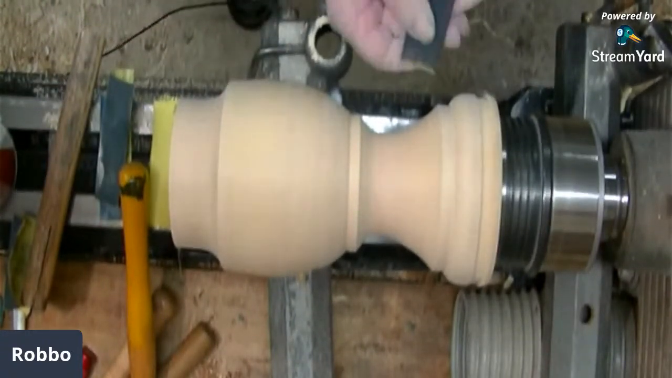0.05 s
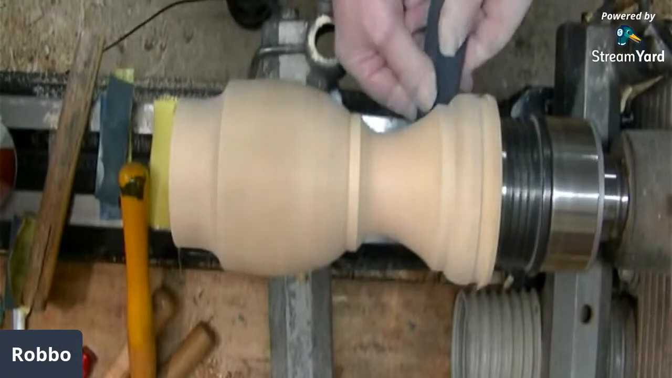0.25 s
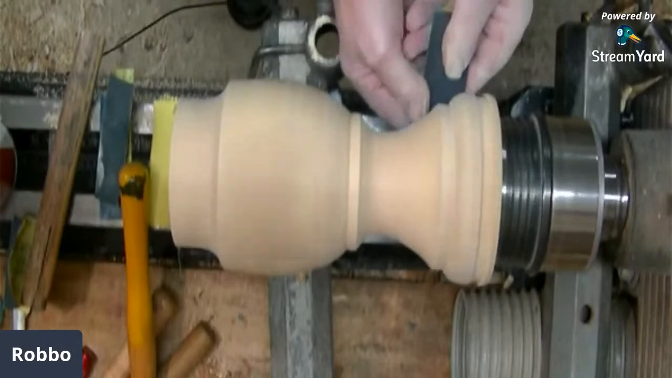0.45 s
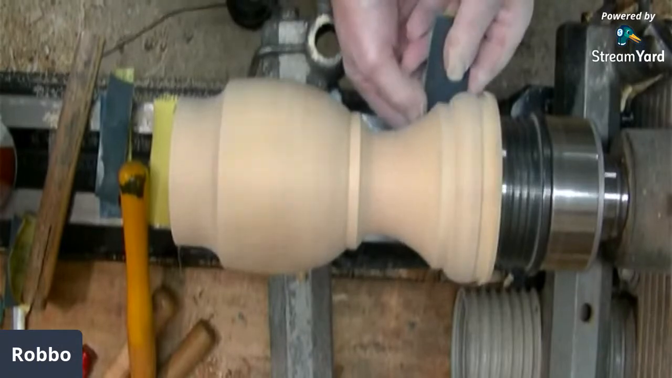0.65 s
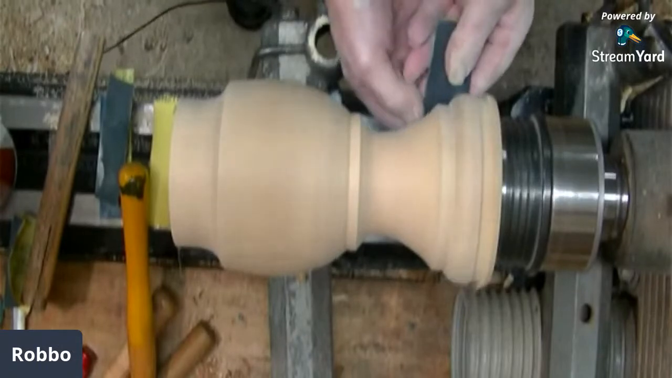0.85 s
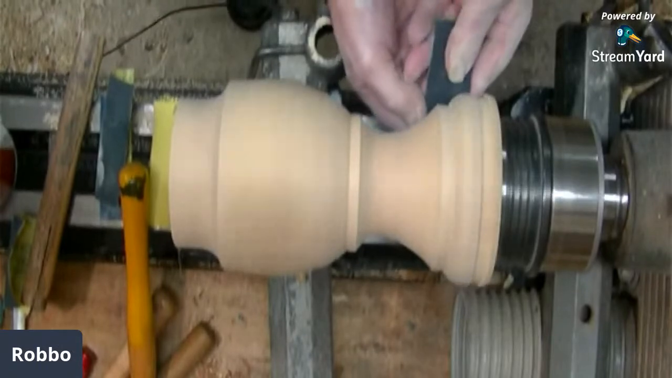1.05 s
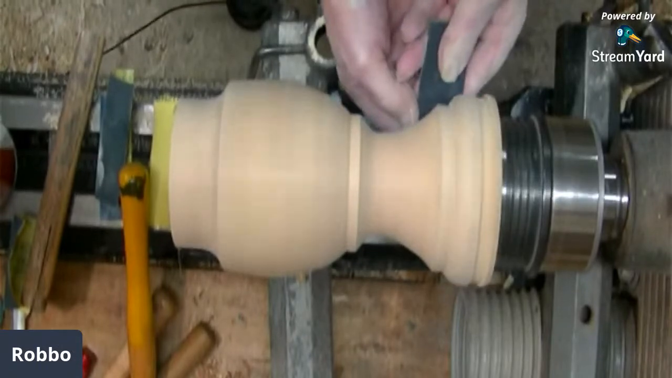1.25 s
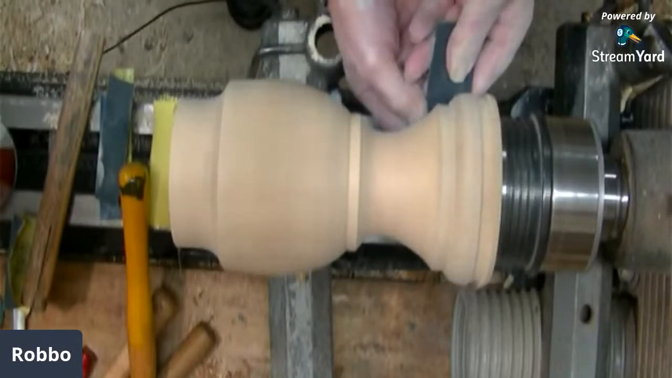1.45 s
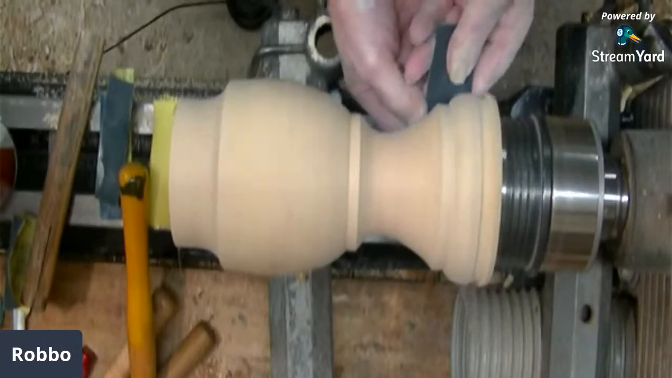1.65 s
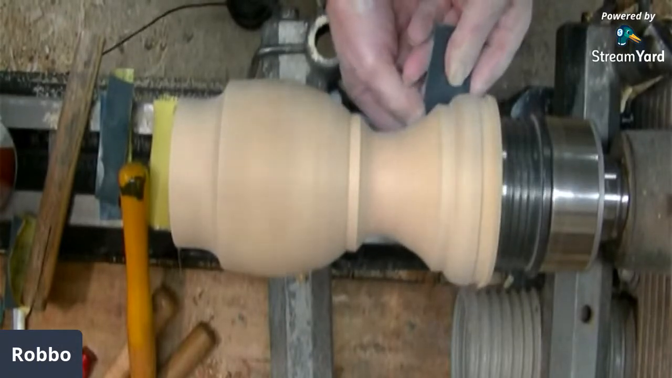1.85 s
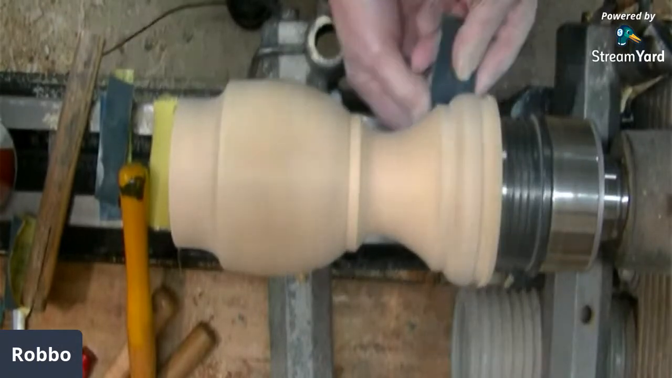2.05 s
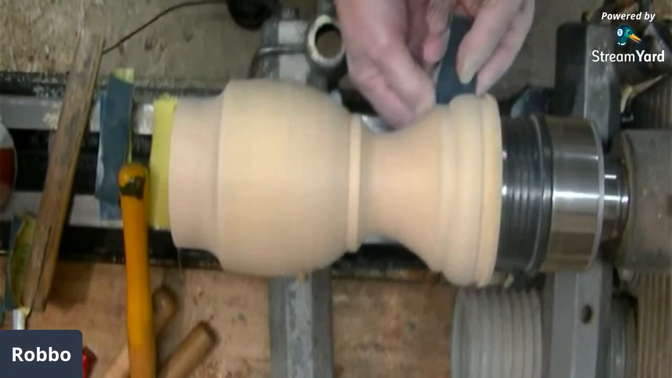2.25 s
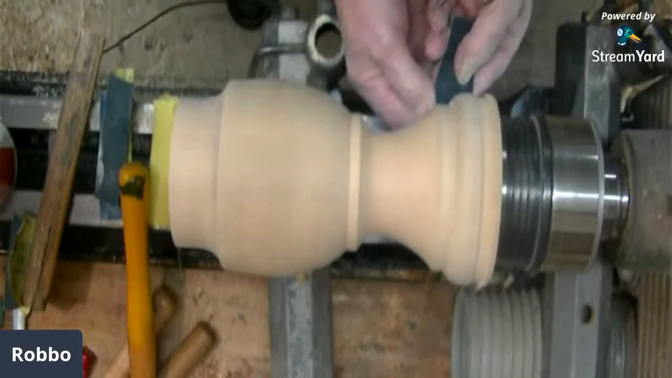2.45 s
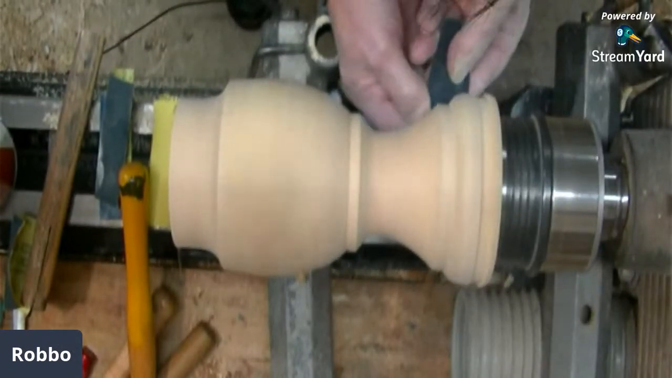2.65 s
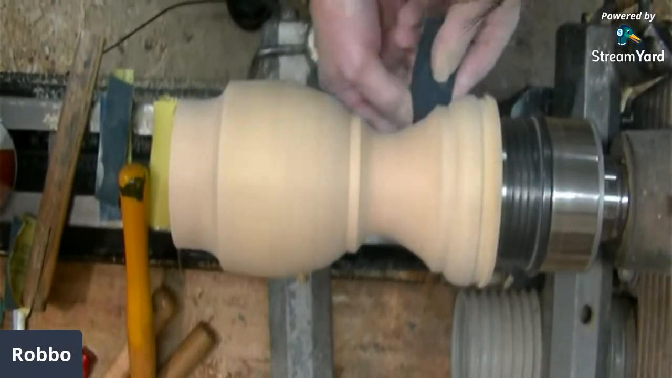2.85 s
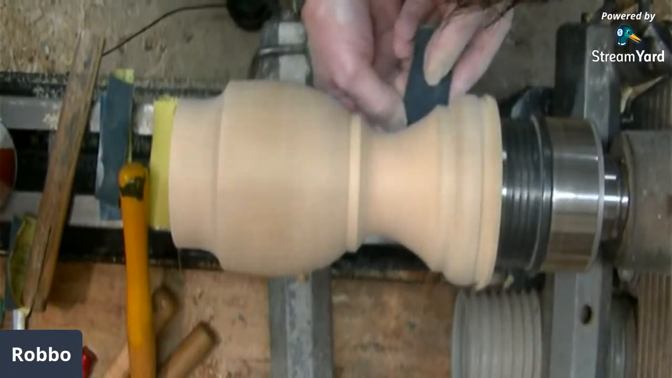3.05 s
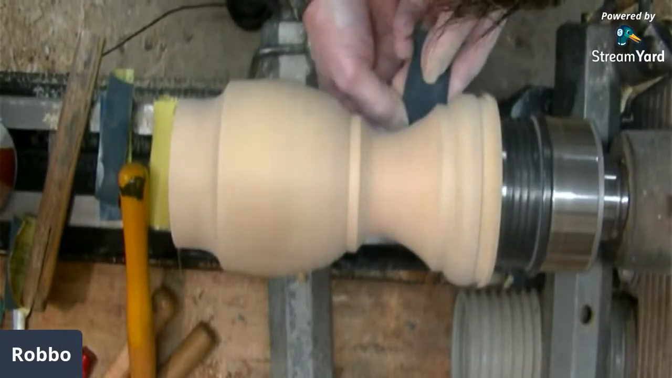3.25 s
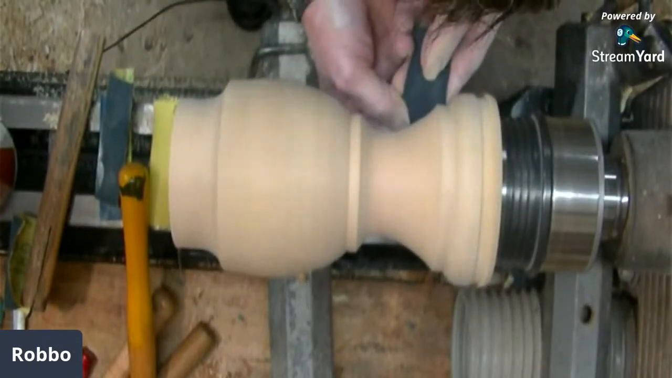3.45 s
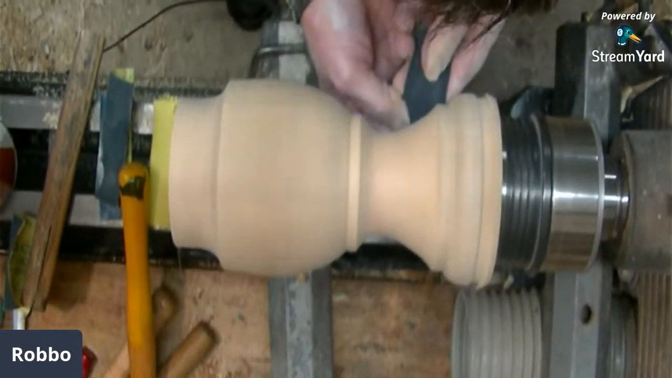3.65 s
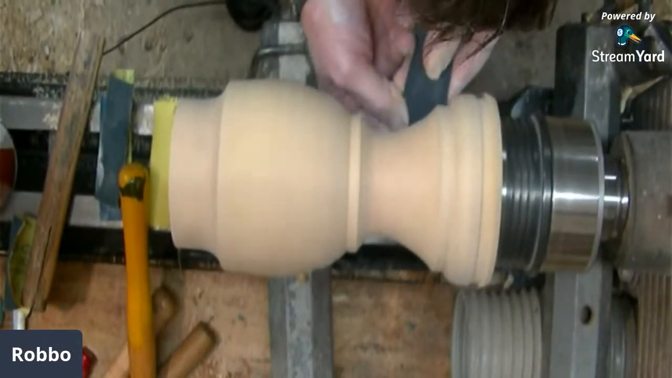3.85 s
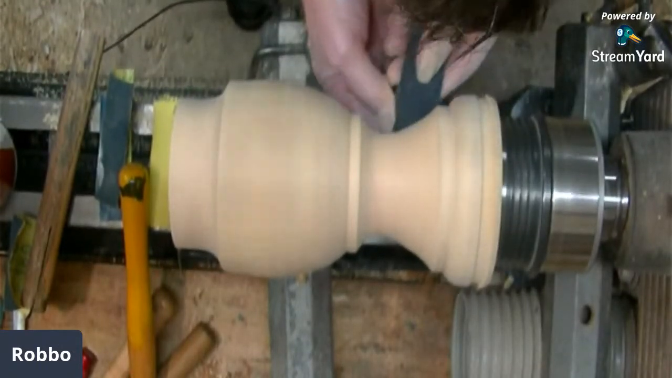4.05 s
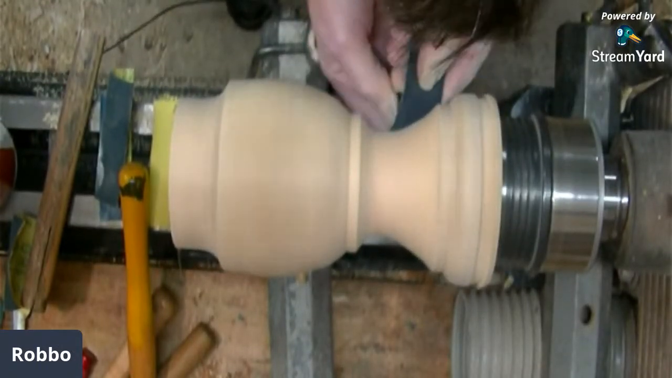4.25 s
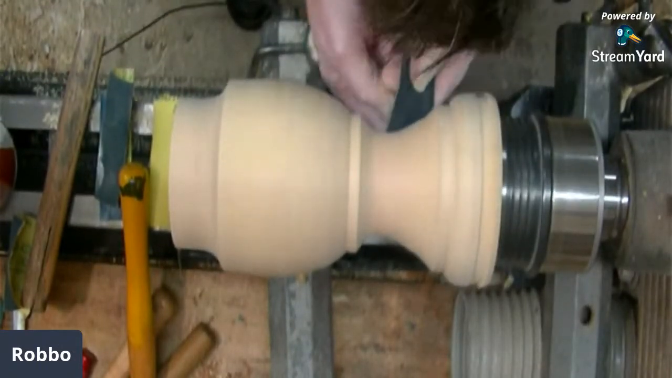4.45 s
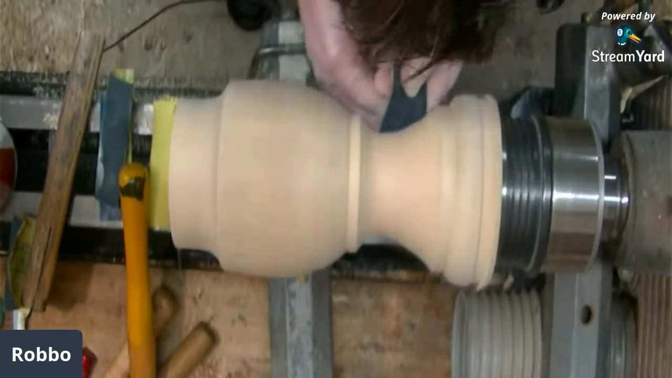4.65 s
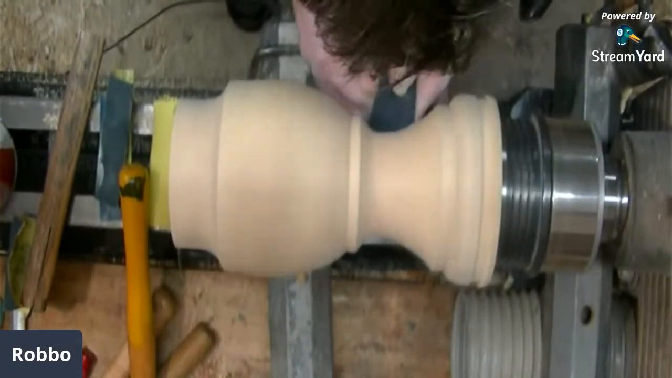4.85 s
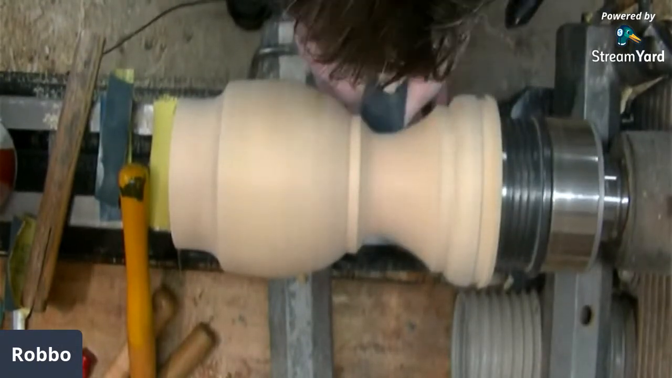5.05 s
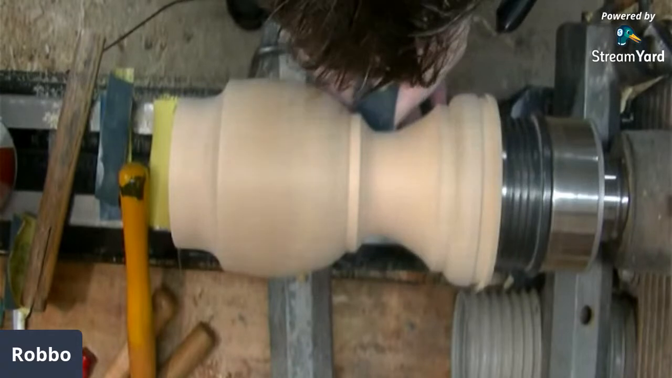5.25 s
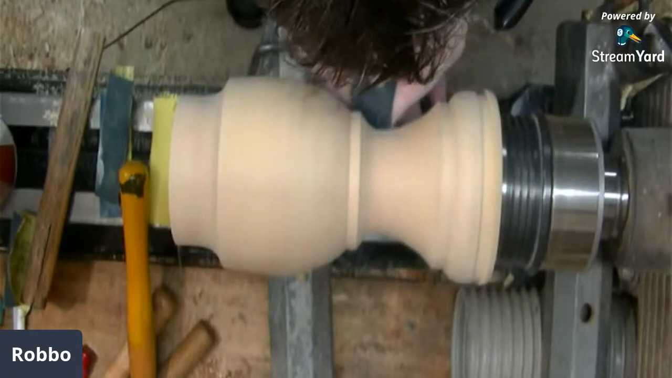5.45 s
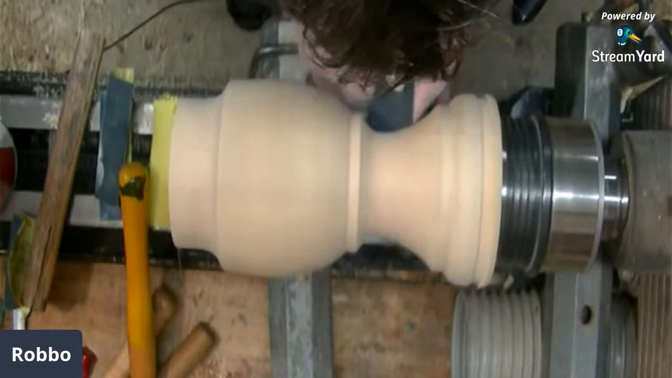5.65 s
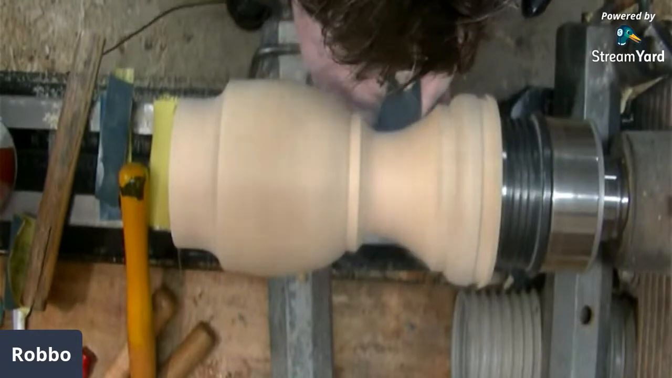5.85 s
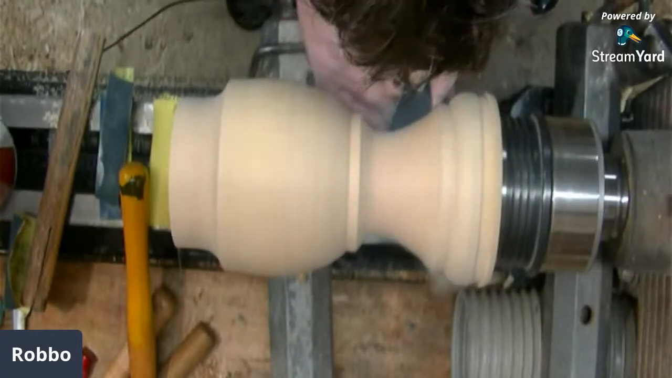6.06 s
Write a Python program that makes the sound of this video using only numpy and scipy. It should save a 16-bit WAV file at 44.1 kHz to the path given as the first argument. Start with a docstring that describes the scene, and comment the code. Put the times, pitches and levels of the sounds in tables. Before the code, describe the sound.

Close in a workshop, a lathe motor blows steady air with a faint hum and thin high whine. After about half a second, sandpaper meets the spinning wood with a bright, gritty rasp, fluttering quickly with each turn. It eases near two seconds, returns near three, breaks briefly around four, then continues strongly to the end. Occasional low thuds.

```python
"""Sanding a turning vase

Abrasive paper rasps against a wooden vase spinning on a lathe, close to one microphone.
Noise for the grit is coloured by paper, wood and fingers; rings shift with the grip, and each turn throbs.
Behind it the motor blows (shaped noise) and hums, its drive whines (narrowband noise tones),
and now and then a low thud, a few enveloped cycles with a dull knock, reaches the microphone."""
import sys
import numpy as np
from scipy import signal
from scipy.io import wavfile
from scipy.ndimage import uniform_filter1d

SR = 44100
rng = np.random.default_rng(int(sys.argv[2]) if len(sys.argv) > 2 else 0)


def generate_wav(sig):
    """Save sig (samples, or channels by samples) to the path in sys.argv[1] as 16-bit PCM at SR."""
    pcm = np.round(np.clip(np.atleast_2d(sig).T, -1, 1) * 32767).astype(np.int16)
    wavfile.write(sys.argv[1], SR, pcm)


N = 269451  # samples

# How the grip loads paper and wood: (time [s], paper fold ring [dB], grit hiss over fold [dB],
# wood scrape over fold [dB], wooden body ring [dB])
GRIP = [(0, -48.5, -6, 5.5, -37.5), (0.36, -48.5, 1, 5, -37), (0.47, -31, -2, -3, -38),
        (0.56, -32, -3, -2, -36.5), (0.63, -24.5, 5, -6, -32.5), (0.8, -21.5, -2.5, -7, -33.5),
        (0.95, -24.5, 2, -7, -33), (2.08, -28.5, 4, -2.5, -35), (2.18, -33, -2, -2, -36),
        (2.68, -33.5, -4, -2, -36.5), (2.78, -38, 1, -1, -34.5), (2.86, -38, 7, -9, -37),
        (2.89, -26.5, -4, -3, -34.5), (2.94, -31, -1, -5, -34.5), (2.98, -41.5, 2, 6, -41),
        (3.03, -24.5, 1, -8, -34.5), (3.33, -22, -5.5, -8.5, -33), (3.56, -25.5, 3, -5.5, -33.5),
        (4.02, -30.5, -3, -6, -37.5), (4.1, -48.5, -4, 5, -38), (4.21, -23.5, 1, -3, -35.5),
        (4.45, -26, 3, -2, -35), (4.62, -22.5, -2, -6.5, -34), (4.8, -23, 2.5, -3.5, -35.5),
        (5.15, -23, 2.5, -2, -31.5), (5.58, -24.5, 3.5, -2, -31), (5.72, -23.5, 1.5, -7, -36.5),
        (6.11, -25, 0.5, -7, -34.5)]
# Spectrum of the grit hiss: (frequency [Hz], relative density [dB per Hz])
GRIT_SPECTRUM = [(6000, -40), (9000, -22), (11500, -6), (12200, 5), (14500, 3.5), (15500, 3.5),
                 (17000, -12)]
# Spectrum of the ringing paper fold: (frequency [Hz], relative density [dB per Hz])
FOLD_SPECTRUM = [(6500, -44), (7800, -15.5), (8200, -0.5), (10000, 1.5), (11600, 2.5), (12200, -8),
                 (14000, -14.5)]
# Spectrum of the wood scrape: (frequency [Hz], relative density [dB per Hz])
SCRAPE_SPECTRUM = [(1800, -24), (3000, -24), (3800, -1.5), (4600, 1), (5600, -1), (7000, 3.5), (7600, 1),
                   (7900, 1.5), (10000, -32)]
# The paper bites harder, or slips, for a moment: (middle [s], half length to 1/e [s], change [dB])
BITES = [(0.65, .03, -2), (0.862, .03, 6.5), (0.91, .02, -2), (1.07, 0.032, 1.5), (1.21, 0.023, 2),
         (1.37, 0.028, 1), (1.58, .03, 0), (1.785, 0.036, 1), (2.73, 0.024, 9), (2.805, .015, -11),
         (3.157, 0.033, 2), (3.495, .04, 1), (3.827, 0.026, 3), (3.89, .015, -2), (3.94, .03, 2),
         (4.22, 0.031, 2), (4.303, 0.02, 6), (4.51, 0.027, 3), (4.817, .04, 1.5), (4.92, .025, 2),
         (5.0, .03, 3), (5.3, .02, 1), (5.33, .015, -4), (5.4, 0.045, 1.5), (6.036, .03, 5)]
# A hollow between fingers and paper rings while the grip holds its shape:
# (middle [s], half length to 1/e [s], frequency [Hz], boost [dB])
HOLLOWS = [(0.49, .05, 9550, 7), (0.75, 0.12, 5030, 10), (0.86, 0.055, 10900, 4.5), (1.09, 0.2, 4800, 3.5),
           (1.21, 0.037, 10600, 4.5), (1.65, .1, 4670, 2.5), (2.05, 0.074, 6800, 4), (2.9, .05, 11100, -1),
           (2.903, 0.027, 3520, 4), (3.25, 0.14, 3500, 2.5), (3.107, 0.066, 6670, 10),
           (3.21, .05, 6100, 6.5), (3.36, .14, 11200, 2), (3.56, 0.15, 8840, 5), (4.6, .12, 6300, 12),
           (4.86, 0.19, 5700, 6.5), (5.02, .08, 6040, 3), (5.13, 0.063, 4700, 6), (5.48, 0.1, 10300, 7.5),
           (5.5, .15, 4200, 3), (6.004, 0.12, 6840, 6)]
# Spectrum of the cooling air: (frequency [Hz], relative density [dB per Hz])
BLOWER_SPECTRUM = [(20, -24), (60, -26), (240, -17.5), (420, -11.5), (700, -8), (1300, -4.5), (2200, -4.5),
                   (3000, -7.5), (4500, -11), (7600, -22.5), (7900, -25), (8200, -7.5), (9600, -14),
                   (10500, -32), (15600, -15.5)]
# Strength of the cooling air: (time [s], level [dB])
BLOWER_LEVEL = [(0, -35.5), (1.3, -36), (2.5, -35), (4, -34.5), (5, -34.5), (6.11, -33)]
# Motor and frame tones: (frequency [Hz], nominal width [Hz], level [dB])
HUM_TONES = [(98, 39, -71.5), (50, 4, -77), (200, 30, -58), (288.7, 7.8, -63.5), (365.5, 23, -65),
             (503.5, 11.6, -60.5), (593, 30, -56.5), (751, 6.8, -60.5), (900, 11, -58), (1212, 53, -56.5),
             (1385, 19, -76), (1419, 24, -54)]
# Swells of the whirr: (time [s], level [dB])
WHIRR_LEVEL = [(0, -48), (1.3, -51), (1.7, -44.5), (2.2, -42.5), (2.5, -52), (3.4, -54), (4.2, -40),
               (4.6, -47), (5.2, -42), (6.11, -44.5)]
# The drive's pair of switching tones: (frequency [Hz])
WHINE_HZ = [8962, 9022]
# Low thuds: (start [s], nominal peak [dB], frequency [Hz], time scale [s], knock [dB])
THUDS = [(0.259, -40, 127, 0.032, -49), (0.384, -45, 166, 0.038, -48), (0.635, -46, 155, 0.039, -43),
         (1.831, -32, 154, 0.027, -48), (1.844, -40, 143, 0.028, -45), (3.549, -39, 145, 0.029, -47),
         (4.611, -40, 113, 0.044, -47), (4.652, -31, 126, 0.035, -53), (5.836, -41, 199, 0.049, -48),
         (5.914, -39, 113, 0.034, -35.5), (5.96, -40.5, 146, 0.063, -42.5)]

FRAME, HOP = 512, 128  # samples, for the rasp's moving spectrum
TURNS_HZ = 13.15
FOLD_SHARE, SCRAPE_SHARE = 0.28, 0.067  # of each bite's dB
HOLLOW_HALF_WIDTH_HZ = 860  # to 1/e of the boost in dB
FOLD_HZ, PALM_HZ, PALM_DB = 10450, 4660, 1.5
BODY_HZ, BODY_FROM_DB, BODY_HZ_PER_DB = 2870, -36, 49  # the body's ring rises as it swells
BODY_FLICKER_DB = 1  # rms
WHIRR_HZ, WHINE_DB = 1770, -54.5  # whine level of each tone
EDGE_HZ = 15720  # upper band limit


def gain_of(db):
    """Logarithmic level: decibels become an amplitude ratio."""
    return 10 ** (np.asarray(db) / 20)


def evened(x):
    """Power normalisation: scales a signal to rms 1."""
    return x / np.sqrt(np.mean(x ** 2) + 1e-20)


def unit(gain):
    """Power normalisation of a spectrum: the squares in each column sum to one."""
    return gain / np.linalg.norm(gain, axis=0)


def read(points, hz):
    """Spectral density on a log frequency axis, as a column of gains with unit total power."""
    f, db = np.transpose(points)
    gain = gain_of(np.interp(np.log(hz + 1), np.log(f + 1), db))
    return unit(gain)[:, None]


def along(table, t):
    """Linear interpolation in time of every level column of a table."""
    s, *columns = np.transpose(table)
    return [np.interp(t, s, column) for column in columns]


def bell(x, middle, half_width):
    """Gaussian localisation in time or frequency; half_width reaches 1/e."""
    return np.exp(-((x - middle) / half_width) ** 2)


def shaped(x, magnitude, size):
    """Short-time filtering: a flat sound takes a spectrum by frame; unit power gives rms 1."""
    overlap = size - size // 4
    z = signal.stft(x, nperseg=size, noverlap=overlap)[2]
    z = z * magnitude[:, :z.shape[1]] * np.sqrt(size / 2)
    return signal.istft(z, nperseg=size, noverlap=overlap)[1][:N]


def patches(shape, bins, frames):
    """Local correlation: a random field averaged over frequency and time, rms 1."""
    field = rng.standard_normal(shape[::-1]).T
    across_frequency = uniform_filter1d(field, bins, axis=0)
    return evened(uniform_filter1d(across_frequency, frames, axis=1))


def fuzzy_tone(hz, width_hz):
    """Narrowband noise: twice low-passed complex noise lets a tone's size and phase wander; rms 1."""
    r = np.exp(-np.pi * width_hz / SR)
    wander = [1, 1j] @ rng.standard_normal((2, N + SR))
    for _ in range(2):
        wander = signal.lfilter([1 - r], [1, -r], wander)
    carrier = np.exp(2j * np.pi * hz * np.arange(N) / SR)
    return evened((wander[SR:] * carrier).real)  # the first second lets the filters settle


def add(mix, s, sound):
    """Superposition: adds a sound into the mix from second s."""
    part = mix[round(s * SR):][:len(sound)]
    part += sound[:len(part)]


def scratches():
    """Random excitation: dense grit contacts of uneven size make noise of uneven strength."""
    sizes = uniform_filter1d(rng.exponential(1, N), size=3)
    strength_db = 2.5 * np.minimum(sizes, 2.6)
    return evened(rng.standard_normal(N) * gain_of(strength_db))


def turn_throb_db(t):
    """Periodic modulation: the changing grain and run-out of the turning wood vary the level."""
    turn = 2 * np.pi * TURNS_HZ * t
    # the piece runs slightly out of true; end grain and side grain pass twice a turn
    return 0.63 * np.cos(turn + 1.6) + 0.41 * np.cos(2 * turn + 3.7)


def body_power(hz, body_db):
    """Resonance: the wooden body rings in a broad band whose main peak rises with its level."""
    load_db = np.maximum(body_db - BODY_FROM_DB, 0)
    main_ring = bell(hz[:, None], BODY_HZ + BODY_HZ_PER_DB * load_db, 830)
    ring = unit(main_ring + 0.57 * bell(hz[:, None], 3250, 2050))
    flicker_db = BODY_FLICKER_DB * patches((1, len(body_db)), bins=1, frames=7)
    mottle_db = 1.76 * patches((len(hz), len(body_db)), bins=4, frames=21)
    return (gain_of(body_db + flicker_db + mottle_db) * ring) ** 2


def rasp():
    """Source and filter: grit scratches excite the paper, wood and hollows under the fingers."""
    hz = np.fft.rfftfreq(FRAME, 1 / SR)
    t = np.arange(N // HOP + 4) * HOP / SR
    column_hz, shape = hz[:, None], (len(hz), len(t))
    fold_db, hiss_over_db, scrape_over_db, body_db = along(GRIP, t)
    bite_db = sum(db * bell(t, s, half) for s, half, db in BITES)
    hollow_db = sum(db * bell(t, s, half) * bell(column_hz, f, HOLLOW_HALF_WIDTH_HZ)
                    for s, half, f, db in HOLLOWS)

    # creases in the paper give many narrow rings that shift as the fingers move
    crease_db = 2.5 * bell(column_hz, FOLD_HZ, 1060) + 2.6 * patches(shape, bins=3, frames=31)
    fold = unit(read(FOLD_SPECTRUM, hz) * gain_of(crease_db))
    palm_db = PALM_DB * bell(column_hz, PALM_HZ, 450) + 1.86 * patches(shape, bins=3, frames=31)
    scrape = unit(read(SCRAPE_SPECTRUM, hz) * gain_of(palm_db))

    hiss_level_db = fold_db + hiss_over_db + bite_db
    scrape_level_db = fold_db + scrape_over_db + SCRAPE_SHARE * bite_db
    fold_level_db = fold_db + FOLD_SHARE * bite_db
    power = (gain_of(hiss_level_db) * read(GRIT_SPECTRUM, hz)) ** 2
    power = power + (gain_of(scrape_level_db) * scrape) ** 2
    power = power + (gain_of(fold_level_db) * fold) ** 2

    tremor_db = 0.7 * patches((1, len(t)), bins=1, frames=7)
    power = power * gain_of(turn_throb_db(t) + tremor_db) ** 2
    power = power + body_power(hz, body_db)
    return shaped(scratches(), np.sqrt(power) * gain_of(hollow_db), size=FRAME)


def blower():
    """Turbulence: cooling air is broadband noise with a slowly drifting spectrum."""
    hz = np.fft.rfftfreq(2048, 1 / SR)
    ripple_db = 2.3 * patches((len(hz), 1), bins=2, frames=1)  # room reflections comb the spectrum
    drift_db = 0.9 * patches((len(hz), N // 512 + 4), bins=8, frames=6)
    spectrum = read(BLOWER_SPECTRUM, hz) * gain_of(ripple_db + drift_db)
    air = shaped(rng.standard_normal(N), spectrum, size=2048)
    return air * gain_of(along(BLOWER_LEVEL, np.arange(N) / SR)[0])


def motor_tones():
    """Narrowband radiation: motor, frame and drive sound as wavering tones."""
    hum = sum(gain_of(db) * fuzzy_tone(hz, width) for hz, width, db in HUM_TONES)
    whine = gain_of(WHINE_DB) * sum(fuzzy_tone(hz, 6.6) for hz in WHINE_HZ)
    whirr_gain = gain_of(along(WHIRR_LEVEL, np.arange(N) / SR)[0])
    return hum + whine + whirr_gain * fuzzy_tone(WHIRR_HZ, 71)


def thuds():
    """Transient oscillation: low cycles and a weaker octave below swell and fade with a dull knock."""
    out = np.zeros(N)
    dull = signal.butter(2, [200, 900], "band", fs=SR)
    knocks = signal.lfilter(*dull, rng.standard_normal((len(THUDS), SR // 4)))
    for (s, db, hz, length, knock_db), knock in zip(THUDS, knocks):
        u = np.arange(0, 3 * length, 1 / SR) / length  # time in units of the thud's time scale
        phase = 2 * np.pi * hz * length * u
        cycles = np.cos(phase) + 0.27 * np.cos(phase / 2)
        swell = (2.3 * u * np.exp(1 - 2.64 * u)) ** 2
        knock_swell = (3 * u * np.exp(1 - 3 * u)) ** 3
        add(out, s, gain_of(db) * swell * cycles)
        add(out, s, gain_of(knock_db) * knock_swell * evened(knock)[:len(u)])
    return out


def scene():
    """Superposition at one microphone, which feeds both channels."""
    return np.tile(rasp() + blower() + motor_tones() + thuds(), (2, 1))


def record(dry):
    """Band limitation: a linear-phase low-pass filter removes the highest treble."""
    low_pass = signal.firwin(1023, EDGE_HZ, window=("kaiser", 9), fs=SR)
    return signal.oaconvolve(dry, low_pass[None], "same")


dry = scene()
out = record(dry)
generate_wav(out)
```